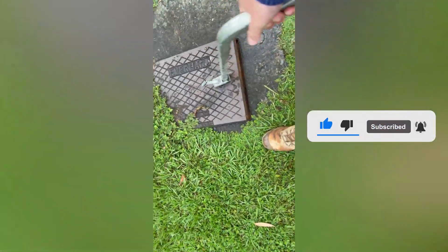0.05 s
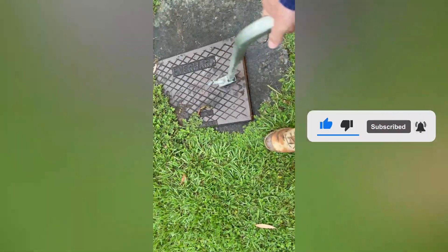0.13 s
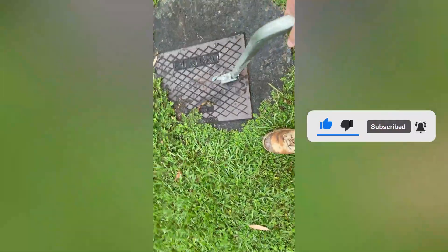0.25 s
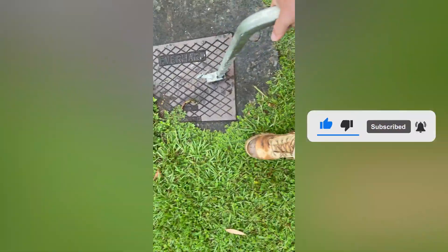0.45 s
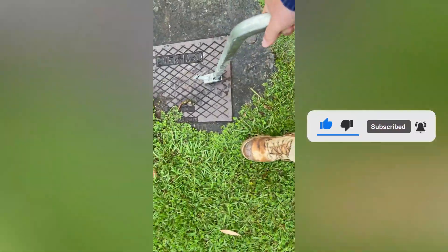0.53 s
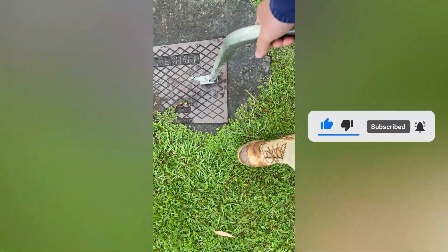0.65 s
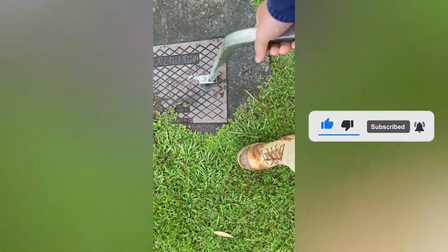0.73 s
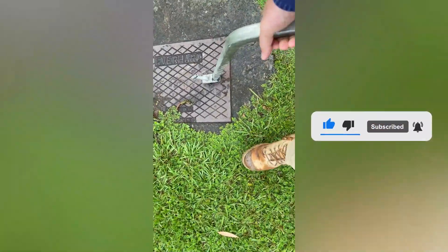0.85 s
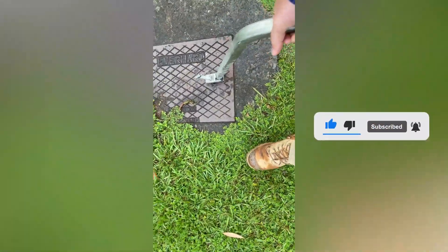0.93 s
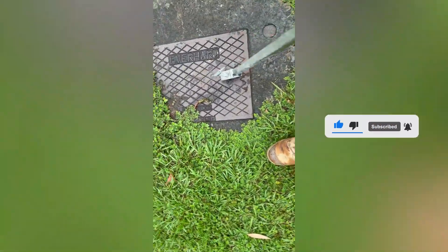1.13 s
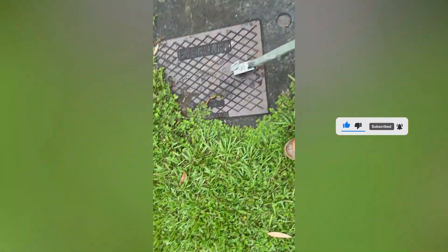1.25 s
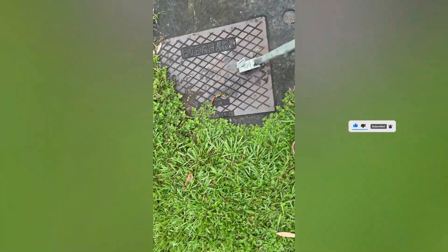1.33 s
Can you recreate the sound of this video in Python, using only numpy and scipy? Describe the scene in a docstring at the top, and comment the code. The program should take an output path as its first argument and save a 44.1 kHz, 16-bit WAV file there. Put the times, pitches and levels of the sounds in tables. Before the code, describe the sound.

A heavy metal lid slides briefly over concrete and drops into its frame with one loud, booming clank. The lifting key then ticks and knocks as it is worked loose, close by, over a low outdoor rumble.

```python
"""Metal lid dropped into its frame

A heavy lid, held by a lifting key, slides over concrete and lands with one clank: lid, key and slab
ring together. The pit below booms, grit crunches in the seat and the yard answers faintly. Then the
key ticks, knocks and scuffs as it is worked loose, over a low outdoor rumble."""
import sys
import numpy as np
from scipy import signal
from scipy.fft import rfft, irfft
from scipy.io import wavfile

SR = 44100
rng = np.random.default_rng(int(sys.argv[2]) if len(sys.argv) > 2 else 0)


def log_audio(samples):
    """Write samples as a 16-bit WAV file to the path given in sys.argv[1]."""
    # one column per channel
    frames = np.atleast_2d(samples).T
    # limit to full scale, then quantise
    limited = np.clip(frames, -1, 1)
    pcm = np.round(limited * 32767).astype(np.int16)
    wavfile.write(sys.argv[1], SR, pcm)


N = 61739
T = np.arange(N) / SR
DROP_S = .2285


# body of the clank, and the faint long ring of the seated lid: f/Hz, level/dB, t60/s
LID_MODES = [(187, -22.5, 0.23), (222.7, -9.5, 0.085), (260.8, -14.5, 0.173), (305, -20.5, 0.084),
             (340, -18, .2), (364, -17, 0.12), (402, -15, 0.11), (439, -15.5, 0.16), (528.7, -8.5, .14),
             (600.2, -13, 0.1), (649, -25.5, 0.058), (684.5, -14.5, 0.103), (827, -33, 0.087),
             (1030, -23.5, 0.14), (1190, -13, 0.17), (1255, -26.5, 0.15), (1310, -27, 0.19),
             (1408, -27, 0.13), (1705, -29, 0.14), (1815, -26, 0.11)]
AFTERRING_MODES = [(257, -37, 1.14), (535, -39, 1.13), (602, -38, 0.45), (1110, -48, 0.64)]
def lid_clank():
    """The lid hits its frame and rings; a few quiet modes hang on."""
    return ring(LID_MODES, DROP_S) + ring(AFTERRING_MODES, DROP_S)


# bright ring of the lifting key: f/Hz, level/dB, t60/s
KEY_MODES = [(2582, -32.5, 0.076), (2911, -30.5, 0.055), (3035, -42, 0.049), (4190, -49, 0.059),
             (4840, -41, 0.088), (5240, -30, .03), (5610, -29, 0.02), (6300, -32.5, 0.035),
             (6740, -36.5, 0.038), (7200, -34.5, 0.032), (8140, -52, 0.046)]
# jolts to the key: t/s, level/dB
KEY_JOLTS = [(.2285, -3), (.2862, 2.5)]
def key_clinks():
    """The landing jolts the key, which clinks again as the lid seats."""
    return blows(KEY_JOLTS, KEY_MODES)


# dense, short modes of frame and slab: f/Hz, relative level/dB, t60/s
SLAB_SPECTRUM = [(95, -32, 0.33), (220, -3, 0.16), (613, -3, 0.14), (900, -12.5, 0.15), (1290, -31, 0.14),
                 (1810, -26, 0.18), (3840, -34, 0.29), (8050, -60, 0.16)]
def slab_thud():
    """Frame and slab take the blow, narrower in stereo than the yard."""
    return from_db(-14) * dense_ring(SLAB_SPECTRUM, DROP_S, width_db=-5)


# low end, the air in the pit: f/Hz, level/dB, t60/s
PIT_MODES = [(48, -20, 0.037), (68.7, 2.5, 0.11), (113, -21, 0.24)]
def pit_boom(start, swell_s=.008):
    """The air under the lid swells into a short boom."""
    return ring(PIT_MODES, start) * attack(start, swell_s) ** 2


# crunches in the seat: t/s, level/dB, rise/s, fall/s
GRIT_BURSTS = [(.23, -23.5, 0.0053, 0.0076), (.243, -31.5, 0.0029, .028), (.2875, -26.5, 0.0046, 0.005),
               (.315, -42, 0.011, 0.005)]
# their colour: f/Hz, relative level/dB
GRIT_SPECTRUM = [(900, 6), (1900, -10), (2350, -2.5), (2600, 3.5), (2950, 2), (3400, -4), (4200, 6),
                 (4700, -4), (5400, 6.5), (6400, -2.5), (7300, -0.5), (9000, 3), (12000, -10),
                 (14200, -0.5), (15700, -11)]
def grit_crunch():
    """Grit is crushed under the rim."""
    return rubs(GRIT_BURSTS, GRIT_SPECTRUM)


# fader ride of the hiss: t/s, level/dB
HISS_FADER = [(0, -48.5), (.11, -47), (.16, -46.5), (.22, -44.5), (.35, -53), (.62, -64), (.85, -59.5),
              (1.0, -58.5), (1.27, -56.5), (1.4, -49.5)]
# its colour: f/Hz, relative level/dB
HISS_SPECTRUM = [(300, 13), (750, 7.5), (1400, -0.5), (2700, -0.5), (3400, -3.5), (4200, 1.5), (7000, -3),
                 (8600, -2.5), (11500, -5), (14000, -0.5), (15600, -9)]
def sliding_hiss():
    """Sliding and rustling make a grainy hiss, strongest just before the drop."""
    return fader(HISS_FADER) * grains() * noise(HISS_SPECTRUM)


# tones of the sliding lid: f/Hz, level/dB, t60/s
SLIDE_MODES = [(501, -50.5, 0.62), (723, -48.5, 0.71)]
def sliding_tones():
    """The sliding lid rings softly, fading toward the drop."""
    return ring(SLIDE_MODES, 0)


# thin squeals: t/s, level/dB, rise/s, fall/s, f/Hz
RIM_SQUEALS = [(.082, -54.5, 0.0039, 0.019, 4020), (.37, -58.5, 0.028, 0.059, 4306),
               (.495, -63.5, 0.018, 0.038, 4210)]
def rim_squeals(sag_hz_per_s=1300, width_hz=260):
    """The rim rubs on the frame: narrow, unsteady tones that sink in pitch as the lid slows."""
    smooth = signal.butter(2, width_hz / 2, fs=SR, output="sos")
    out = 0
    for peak, db, rise, fall, hz in RIM_SQUEALS:
        flutter = rms_one(signal.sosfilt(smooth, rng.standard_normal((2, N))))
        phase = 2 * np.pi * np.cumsum(hz - sag_hz_per_s * (T - peak)) / SR
        tone = flutter[0] * np.cos(phase) + flutter[1] * np.sin(phase)
        out = out + swell(peak, db, rise, fall) * pan(hz) * tone
    return out


# sharp ticks: t/s, level/dB, low f/Hz, high f/Hz
TICK_HITS = [(.251, -10, 12300, 15200), (0.2715, -9, 2500, 15500), (0.3351, -21, 1930, 14300),
             (.742, -30, 12000, 15200), (0.8031, -18, 1770, 5600), (0.8031, -12.5, 565, 890),
             (0.803, -22, 9300, 15100), (.814, -31, 5000, 15000), (0.9743, -22, 7600, 16000)]
def ticks(tail_db=-11, fall_s=.001, left_lag_s=.00005):
    """Grit and metal give tiny cracks, each in its own band, with a short crumbling tail."""
    out, white = 0, noise([(1, 0)])
    for start, db, low, high in TICK_HITS:
        crack = from_db(tail_db) * white * (T >= start) * np.exp(-since(start) / fall_s)
        onset = int(start * SR)
        crack[0, onset + round(left_lag_s * SR)] = crack[1, onset] = 1
        out = out + from_db(db) * band(crack, low, high)
    return out


# dull body of a knock: f/Hz, level/dB, t60/s
KNOCK_MODES = [(296, -20, 0.035), (360, -41, 0.016), (533, -21.5, 0.011)]
# knock cues: t/s, level/dB
KNOCK_HITS = [(.943, -13), (1.3145, 1.5)]
def key_knocks():
    """The key knocks as it is worked loose."""
    return blows(KNOCK_HITS, KNOCK_MODES)


# short, hard ring of the hook: f/Hz, level/dB, t60/s
HOOK_MODES = [(975, -39, 0.035), (1570, -38, 0.023), (2364, -47, 0.089), (3430, -47, 0.043),
              (6540, -52.5, 0.088), (14200, -29, 0.019)]
# clack cues: t/s, level/dB
HOOK_HITS = [(1.336, -6), (1.352, 1.5)]
def hook_clacks():
    """The hook of the key strikes its slot twice in quick succession."""
    return blows(HOOK_HITS, HOOK_MODES)


# scuff cues: t/s, level/dB, rise/s, fall/s
SCUFF_BURSTS = [(.767, -55, 0.0083, 0.027), (.947, -47, 0.011, 0.028), (1.337, -45, .004, 0.01),
                (1.3525, -36, 0.0014, 0.0067)]
# their colour: f/Hz, relative level/dB
SCUFF_SPECTRUM = [(500, 11.5), (1500, 1.5), (2400, 0.5), (4000, 7), (5500, -1.5), (7500, -2), (9500, 3),
                  (11500, -8), (13400, 5.5), (14200, 4.5), (15000, 2.5)]
def key_scuffs():
    """The key rubs in its slot."""
    return rubs(SCUFF_BURSTS, SCUFF_SPECTRUM)


# reverb tail of the yard: f/Hz, relative level/dB, t60/s
YARD_SPECTRUM = [(103, -19, 1), (257, 3.5, 0.62), (600, -2.5, 0.85), (1260, -10, 0.5), (2800, -50, 0.51),
                 (4200, -16, 0.88), (7800, -44, 0.31), (15000, -41, .5)]
def yard(clank, swell_s=.06):
    """The yard answers the clank with scattered echoes and a diffuse tail."""
    scatter = rng.standard_normal((2, N)) * decay(0, t60=1) * attack(0, swell_s)
    response = rms_one(scatter) / np.sqrt(N)
    echoes = signal.fftconvolve(band(clank, 300, 5000), response, axes=1)[:, :N]
    tail = dense_ring(YARD_SPECTRUM, DROP_S) * attack(DROP_S, swell_s)
    return from_db(-42) * echoes + from_db(-33.5) * tail


# thump cues: t/s, level/dB
LOW_THUMPS = [(0.332, -17), (0.944, -16), (1.005, -20.5)]
def low_thumps():
    """A few soft, low thumps rise out of the rumble."""
    return sum(from_db(db) * pit_boom(start) for start, db in LOW_THUMPS)


# bands of the drone: f/Hz, width/Hz, level/dB
DRONE_BANDS = [(80, 15, -38.5), (162.25, 10, -48)]
# its fader ride: t/s, level/dB
DRONE_FADER = [(.06, 1.5), (.16, -9.5), (.55, 1), (.88, -3), (1.14, 1), (1.34, -6.5)]
def distant_drone():
    """Two narrow bands of noise waver as a low, far-off hum."""
    out = 0
    for hz, width, db in DRONE_BANDS:
        hum = band(rng.standard_normal(N + SR), hz - width / 2, hz + width / 2)[SR:]
        out = out + from_db(db) * rms_one(hum)
    return fader(DRONE_FADER) * out


# colour of the outdoor bed: f/Hz, relative level/dB
AIR_SPECTRUM = [(25, -14), (50, 0), (80, -1), (125, -6.5), (200, -9.5), (270, -11), (380, -24.5),
                (700, -26.5), (1500, -33.5), (3000, -41), (8000, -60)]
def outdoor_air():
    """A steady low rumble lies under everything."""
    return from_db(-41.5) * noise(AIR_SPECTRUM)


# stereo width of diffuse sound: f/Hz, side minus mid/dB
STEREO_WIDTH = [(60, -37), (125, -13), (250, -14), (600, 0.5), (1200, -3), (2200, -5), (4500, 5.5),
                (6500, -4.5), (8500, 7), (10000, 30.5), (11500, 5), (13000, -2.5), (15000, -8)]
def noise(spectrum, width_db=0):
    """Steady stereo noise of a given colour, rms 1."""
    hz = np.maximum(np.fft.rfftfreq(2 * N, 1 / SR), 1)
    mid, side = rfft(rng.standard_normal((2, 2 * N)))
    width = from_db(at_hz(STEREO_WIDTH, hz) + width_db)
    gain = from_db(at_hz(spectrum, hz)) * (hz > 20) / np.sqrt(1 + width ** 2)
    stereo = mid + width * side * [[1], [-1]]
    return rms_one(irfft(gain * stereo)[:, :N])


# stereo position of the lid: f/Hz, left minus right/dB, left lead/rad
LID_POSITION = [(60.6, -.5, 0.012), (346, 3, -0.46), (535, -5, -0.85), (750, -3, -0.46), (1250, -6, -0.41),
                (2580, -2, 1.74), (5970, -3.5, -0.41)]
def pan(hz):
    """Left and right gain of the lid at one frequency."""
    return from_db(at_hz(LID_POSITION, hz) * np.array([[.5], [-.5]]))


def ring(modes, start, contact_s=.0015):
    """One blow starts decaying sines, pairwise of opposite sign; they reach the ears out of step."""
    out = 0
    for k, (hz, db, t60) in enumerate(modes):
        lead = np.array([[1], [0]]) * at_hz(LID_POSITION, hz, column=2)
        tone = (-1) ** (k // 2) * np.sin(2 * np.pi * hz * since(start) + lead)
        out = out + from_db(db) * pan(hz) * tone * decay(start, t60)
    return out * attack(start, contact_s)


def blows(hits, modes):
    """Several blows on one body."""
    return sum(from_db(db) * ring(modes, start) for start, db in hits)


def dense_ring(spectrum, start, width_db=0):
    """Dense modes struck at one moment: each half octave of noise dies by its own t60."""
    edges = 40 * 2 ** (np.arange(19) / 2)
    bins, hz = rfft(noise(spectrum, width_db)), np.fft.rfftfreq(N, 1 / SR)
    out = 0
    for low, high in zip(edges, edges[1:]):
        centre = np.sqrt(low * high)
        part = irfft(bins * ((hz >= low) & (hz < high)), N)
        out = out + pan(centre) * part * decay(start, at_hz(spectrum, centre, column=2))
    return out * (T > start)


def grains(per_s=8300, spread_db=3.5, fall_s=.0011):
    """Uneven gain of many tiny fractures, rms 1."""
    fractures = rng.random(N) < per_s / SR
    sizes = from_db(spread_db * np.minimum(rng.exponential(1, N), 5))
    energy = signal.lfilter([1], [1, -np.exp(-1 / (fall_s * SR))], (fractures * sizes) ** 2)
    return rms_one(np.sqrt(np.abs(energy)))


def rubs(bursts, spectrum):
    """Bursts of grainy friction that swell and die."""
    return sum(swell(*burst) for burst in bursts) * grains() * noise(spectrum)


def through_key(friction):
    """Friction is heard directly and through the resonances of the key."""
    return friction + from_db(-11) * signal.fftconvolve(friction, ring(KEY_MODES, 0), axes=1)[:, :N]


def swell(peak, db, rise, fall):
    """Gain that grows up to a moment and dies after it."""
    return from_db(db) * np.exp(-np.maximum(peak - T, 0) / rise - since(peak) / fall)


def attack(start, rise):
    """Gain that eases from 0 to 1."""
    return 1 - np.exp(-since(start) / rise)


def decay(start, t60):
    """Gain that falls 60 dB in t60 seconds."""
    return np.exp(-np.log(1000) * since(start) / t60)


def fader(points):
    """Gain that follows a level curve."""
    return from_db(np.interp(T, *np.transpose(points)))


def since(start):
    """Seconds since a moment, zero before it."""
    return np.maximum(T - start, 0)


def band(x, low_hz, high_hz):
    """Causal band-pass."""
    sos = signal.butter(2, [low_hz, high_hz], "band", fs=SR, output="sos")
    return signal.sosfilt(sos, x + 1e-18)


def at_hz(table, hz, column=1):
    """Read one column of a table on a log-frequency axis."""
    table = np.array(table)
    return np.interp(np.log(hz), np.log(table[:, 0]), table[:, column])


def from_db(db):
    """Decibels to gain."""
    return 10 ** (np.asarray(db) / 20)


def rms_one(x):
    """Scale to rms 1."""
    return x / np.sqrt(np.mean(x ** 2) + 1e-20)


def scene():
    """The clank up front, friction and handling around it, the outdoor bed behind."""
    clank = lid_clank() + key_clinks() + slab_thud() + pit_boom(DROP_S)
    scrape = through_key(sliding_hiss() + grit_crunch())
    friction = scrape + sliding_tones() + rim_squeals() + key_scuffs()
    handling = ticks() + key_knocks() + hook_clacks()
    return clank + yard(clank) + friction + handling + low_thumps() + distant_drone() + outdoor_air()


def record(dry, cutoff_hz=15800):
    """Peaks clip at full scale, then a steep low-pass cuts the top."""
    lowpass = signal.ellip(10, .1, 80, cutoff_hz, fs=SR, output="sos")
    return signal.sosfilt(lowpass, np.clip(dry, -1, 1))


dry = scene()
out = record(dry)
log_audio(out)
```